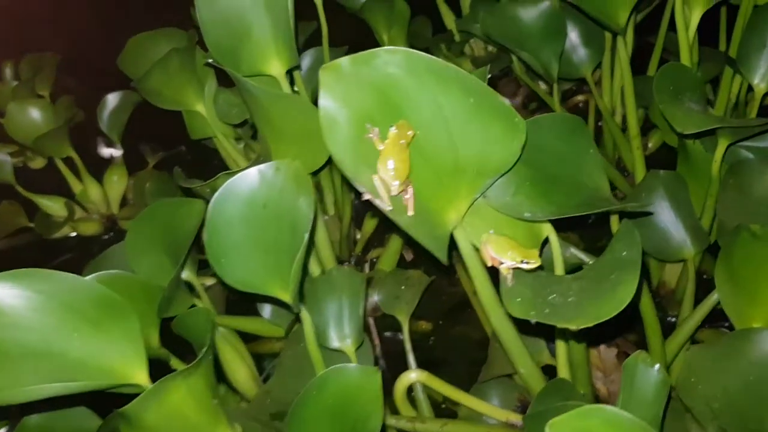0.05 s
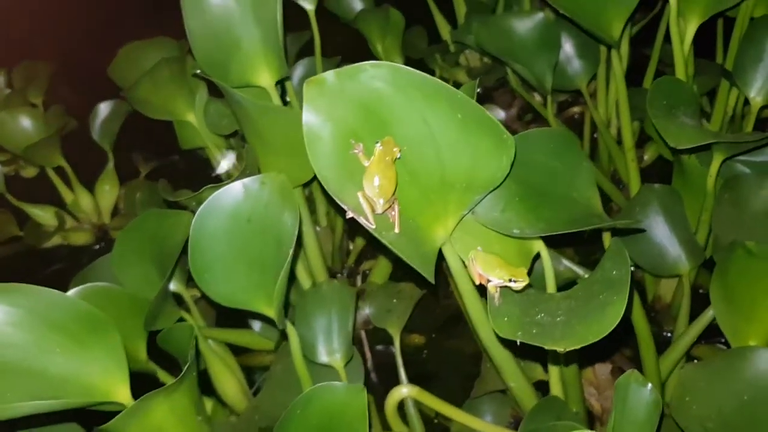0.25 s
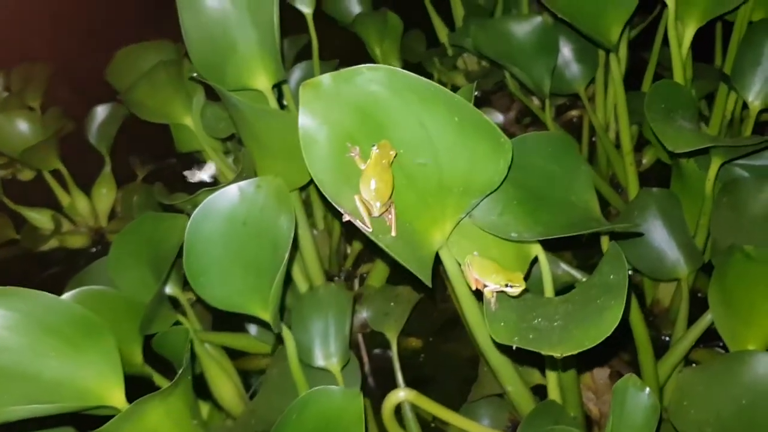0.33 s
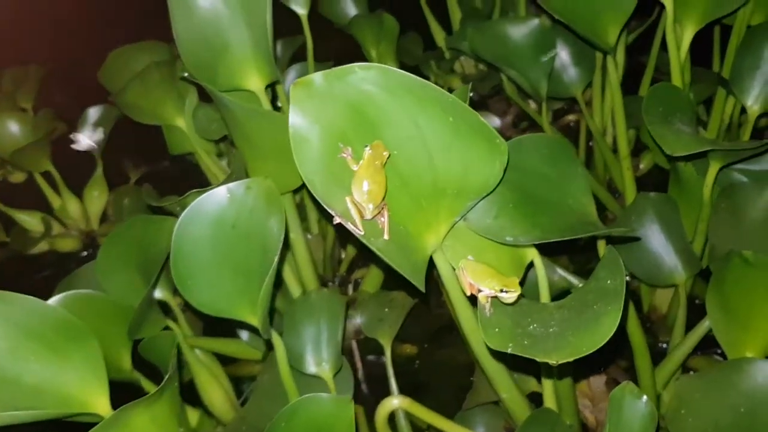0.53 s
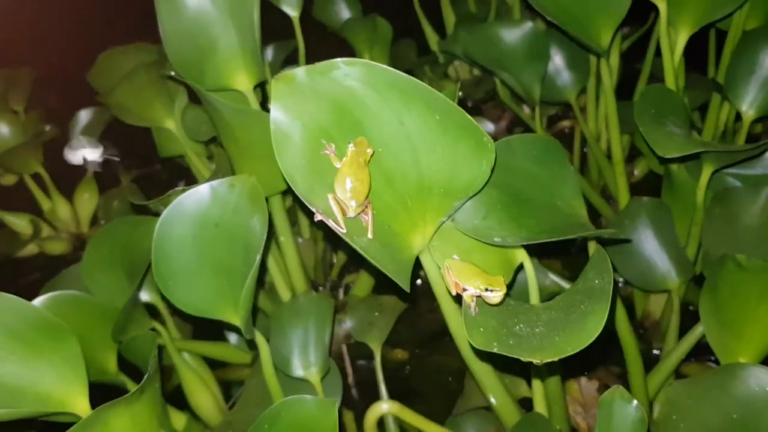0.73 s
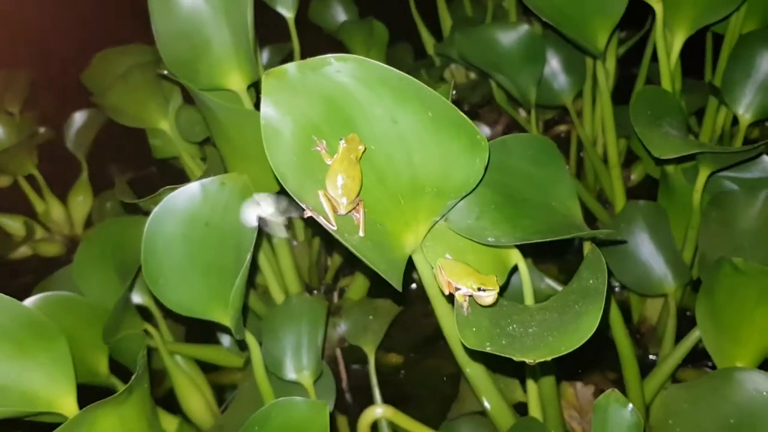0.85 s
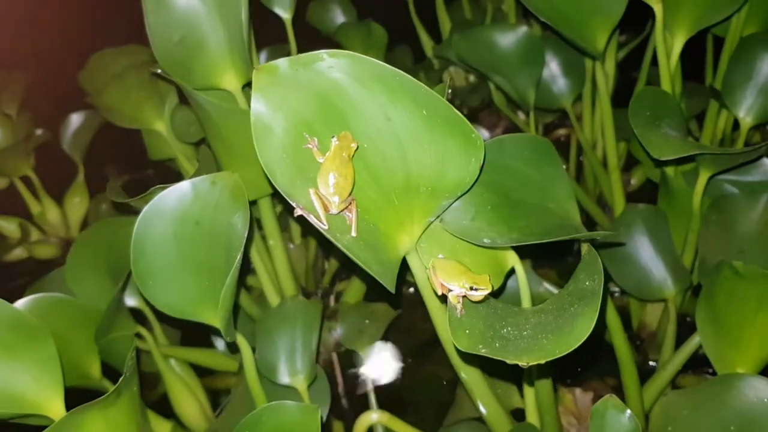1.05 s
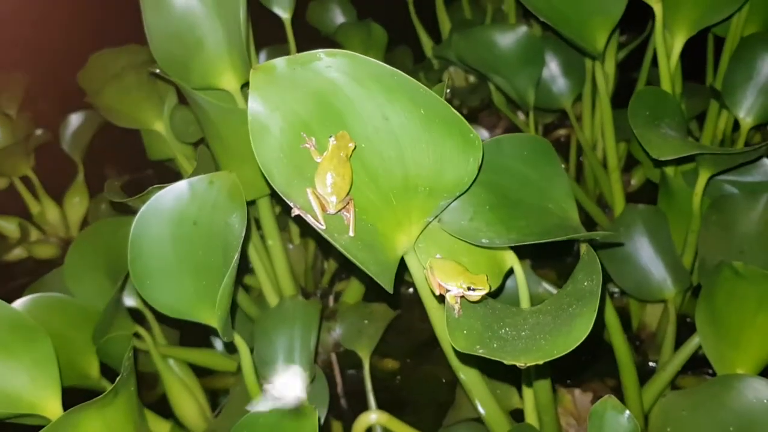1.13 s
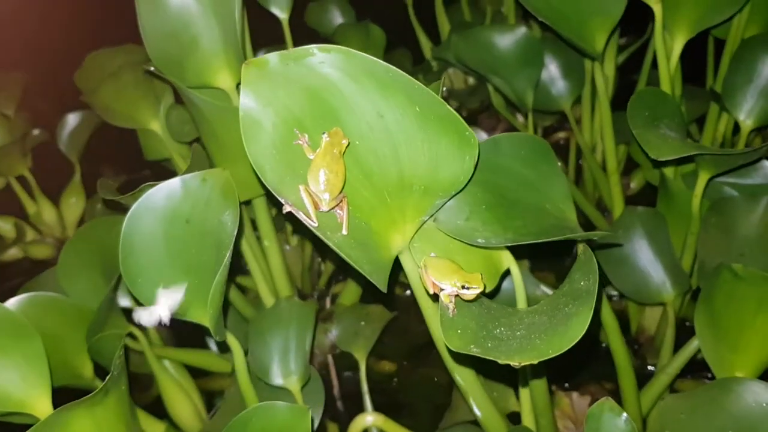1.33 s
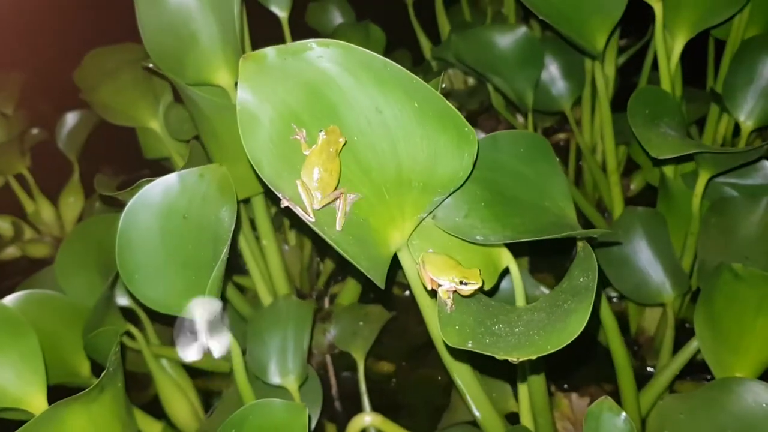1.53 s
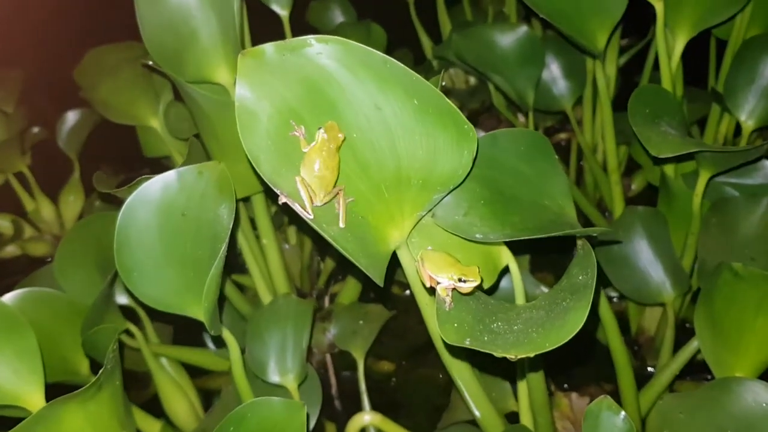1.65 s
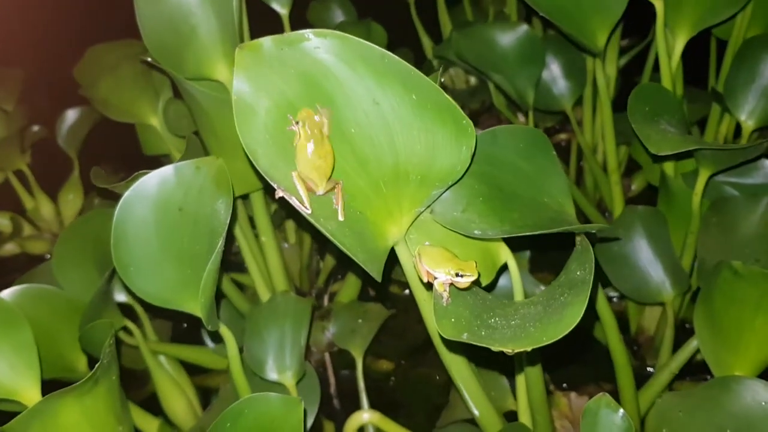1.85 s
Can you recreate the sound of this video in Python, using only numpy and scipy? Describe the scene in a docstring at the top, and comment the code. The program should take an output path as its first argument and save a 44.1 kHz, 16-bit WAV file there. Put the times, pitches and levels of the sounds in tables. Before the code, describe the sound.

A small tree frog clicks close by, slightly right, from the start. Its rattle grows louder and higher, speeds up near 0.9 seconds and stops dead at about 1 second. A farther frog answers at once with a short trill, and a much fainter one trills around 1.7 seconds. Throughout, night insects hiss softly and a distant, lower frog chorus throbs over the wetland's faint rumble.

```python
"""A small tree frog clicks close by, a little to the right, on a floating leaf. Its rattle grows louder,
higher and finally faster, then stops dead. Each click is a snap of its voice box that rings its throat
and vocal sac, the pouch under its chin. Two farther frogs answer with short trills. Behind them a distant
low frog chorus throbs, night insects hiss and the open wetland rumbles faintly."""
import sys
import numpy as np
from scipy import signal
from scipy.fft import rfft, irfft
from scipy.io import wavfile
from scipy.ndimage import uniform_filter1d, minimum_filter1d

SR = 44100
rng = np.random.default_rng(int(sys.argv[2]) if len(sys.argv) > 2 else 0)


def to_wav(s):
    """Save 16-bit WAV."""
    ch = np.atleast_2d(s).T  # columns
    pcm = np.round(np.clip(ch, -1, 1) * 32767)  # PCM
    wavfile.write(sys.argv[1], SR, pcm.astype(np.int16))


N = 83790


def undb(db):
    """Turn decibels into a number to multiply by."""
    return 10 ** (np.asarray(db) / 20)


def level(x, db):
    """Set the average (rms) level of each channel."""
    return x * undb(db) / np.sqrt(np.mean(x ** 2, axis=-1, keepdims=True))


def fade(points):
    """A volume curve through (time_s, level_db) points."""
    return undb(np.interp(np.arange(N) / SR, *np.array(points).T))


def add(out, start_s, sound):
    """Mix a short sound in at a given time."""
    i = int(np.clip(start_s * SR, 0, N))
    out[i:i + len(sound)] += sound[:N - i]


def cut(x, hz, kind, order=4):
    """Keep the "high" or the "low" side of a frequency."""
    return signal.sosfilt(signal.butter(order, hz, kind, fs=SR, output="sos"), x)


def colour(x, points):
    """Shape a sound's tone by (frequency_hz, level_db) points."""
    hz, db = np.array(points).T
    freqs = np.maximum(np.fft.rfftfreq(N, 1 / SR), 1)
    return irfft(rfft(x) * undb(np.interp(np.log(freqs), np.log(hz), db)), N)


def noise(points):
    """Two unrelated noises shaped by (frequency_hz, level_db) points."""
    return colour(rng.standard_normal((2, N)), points)


def wander(turns_per_s):
    """A smooth random wobble, mostly between -1 and 1."""
    step = int(SR / turns_per_s)
    return uniform_filter1d(np.repeat(rng.standard_normal(N // step + 1), step), step)[:N]


def ring(hz, swell_ms):
    """A tone that swells smoothly to its peak and dies away."""
    swell_s = swell_ms / 1000
    t = np.arange(int(9 * swell_s * SR)) / SR
    return (t / swell_s * np.exp(1 - t / swell_s)) ** 2 * np.sin(2 * np.pi * hz * t)


def echoes(x, db, first_s, decay_s):
    """A dense cloud of echoes, different at each ear, that falls 60 dB in decay_s."""
    t = np.arange(SR // 2) / SR
    cloud = rng.standard_normal((2, len(t))) * (t > first_s) * np.exp(-np.log(1000) * t / decay_s)
    cloud /= np.sqrt(np.sum(cloud ** 2, axis=1, keepdims=True))
    return undb(db) * signal.fftconvolve(x[None], cloud, axes=1)[:, :N]


def pulse_train(pulses_per_s, swell_ms, pitch, jitter=0.14, spread_db=3):
    """Uneven pulses, each ringing at the pitch of its moment."""
    out, start_s = np.zeros(N), 0.
    for late, loud in rng.standard_normal((N // 100, 2)):
        if start_s * SR >= N:
            break
        add(out, start_s, undb(spread_db * loud) * ring(pitch[int(start_s * SR)], swell_ms))
        start_s += np.exp(jitter * late) / pulses_per_s
    return level(out, 0)


def rumble():
    """A faint low rumble, nearly alike in both ears, with one soft bump."""
    # tone of the rumble: frequency_hz, level_db
    tone = [(20, -13), (45, -5.5), (72, -2), (100, -2), (140, -13.5), (220, -24), (500, -36)]
    middle, side = level(noise(tone), db=-66)
    add(middle, start_s=1.208, sound=undb(-53) * ring(hz=68, swell_ms=20))
    return middle + undb(-14) * np.array([side, -side])


def rush():
    """A soft low rush that grows with the rattle and ends with it."""
    # tone of the rush: frequency_hz, level_db
    tone = [(60, 0), (150, 3.5), (600, 4), (1200, -6.5)]
    # its rise and fall: time_s, level_db
    loudness = [(0, -73), (.35, -68.5), (.85, -60.5), (.97, -59), (1.01, -100)]
    return level(noise(tone), 0) * fade(loudness)


def insects():
    """Many insects merge into a flickering hiss."""
    # tone of the hiss: frequency_hz, level_db
    tone = [(4500, -36), (5600, -11.5), (6300, -3.5), (6800, -3), (7700, 3.5), (8300, -3), (9200, -18),
            (10500, -27), (15000, -49), (17000, -38.5)]
    hiss = noise(tone)
    flicker_db = 2 * np.array([wander(94), wander(70)])
    return level(hiss * undb(flicker_db), db=-51)


def chorus():
    """Low pulsed calls from far across the water overlap into a throb that swells and eases."""
    # one frog a row: pitch_hz, level_db, pulses_per_s, swell_ms
    voices = [(827.3, -47.5, 63, 5.8), (906.5, -50.5, 42, 6), (883, -49, 44, 5.4), (1105, -55.5, 39, 1.45),
              (1135, -56.5, 41, 2.25)]
    # far calls blurred into noise: frequency_hz, level_db
    blur_tone = [(200, -31), (450, -20), (680, -7), (850, 0), (1300, -0.5), (1550, -2.5), (1950, -1.5),
                 (2600, -8), (3400, -19.5), (4300, -9), (5000, -24.5), (9000, -45.5)]
    # swell of the whole chorus: time_s, boost_db
    swell = [(0, 0), (.3, 2.5), (.6, 7), (.85, 4.5), (1.1, 2), (1.9, 1)]
    calls = 0
    for hz, db, pulses_per_s, swell_ms in voices:
        pitch = hz * (1 + 0.009 * wander(20))
        voice = pulse_train(pulses_per_s, swell_ms, pitch, jitter=0.17, spread_db=2)
        early = echoes(voice, db=3, first_s=0, decay_s=0.011)
        late = echoes(voice, db=0.59, first_s=0.0052, decay_s=0.16)
        calls = calls + level(early + late, db)
    blur = level(noise(blur_tone), db=-54.5)
    return fade(swell) * (cut(calls, 810, "high", order=8) + blur)


def far_frog(curve):
    """A fast trill that swells and rises, smeared by the plants in between."""
    # faint higher tones of the trill: pitch_multiple, level_db
    overtones = [(2, -29), (3, -31.5)]
    pulses_per_s, swell_ms = 140, 1.1
    t = np.arange(N) / SR
    times, db, hz = np.array(curve).T
    pitch = np.interp(t, times, hz)
    trill = pulse_train(pulses_per_s, swell_ms, pitch)
    for multiple, overtone_db in overtones:
        trill += undb(overtone_db) * pulse_train(pulses_per_s, swell_ms / multiple, multiple * pitch)
    loudness = undb(np.interp(t, times, db)) * (t > times[0]) * (t < times[-1])
    trill = cut(trill, 3500, "high") * loudness
    early = echoes(trill, db=-1, first_s=0, decay_s=0.06)
    late = echoes(trill, db=-8.5, first_s=0.0085, decay_s=0.46)
    return level(early + late, 0) * np.std(trill)


def answering_frogs():
    """Two frogs trill in turn as the rattle ends, the second much fainter."""
    # the first frog's trill: time_s, level_db, pitch_hz
    first = [(.96, -63, 4140), (.985, -31, 3980), (1.011, -35, 4120), (1.075, -35.5, 4340),
             (1.13, -27, 4250), (1.148, -59.5, 4240), (1.16, -67, 4370)]
    # the farther frog's trill: time_s, level_db, pitch_hz
    second = [(1.6, -65, 3900), (1.68, -55.5, 4030), (1.755, -51, 4250), (1.79, -63, 4220),
              (1.82, -66, 4250)]
    return far_frog(first) + far_frog(second)


def frog_clicks():
    """Each snap of the voice box briefly rings the vocal sac, the throat and their overtones."""
    # one click a row: start_s, sac_db, sac_pitch_hz, throat_db, overtone_db
    clicks = [(0.0235, -28, 3590, -46, -48), (0.0419, -27, 3250, -51, -53), (0.1031, -25.5, 3200, -34, -39),
              (0.1209, -22, 3240, -31.5, -40.5), (0.158, -24, 3250, -34.5, -40),
              (0.1765, -22, 3240, -31.5, -37.5), (0.2088, -16.5, 3230, -32.5, -34),
              (0.2276, -18.5, 3260, -31, -35.5), (0.28, -21, 3200, -30, -35.5),
              (0.298, -19, 3420, -29.5, -33.5), (0.3176, -20.5, 3830, -31, -39),
              (0.3399, -16, 3500, -29, -33.5), (0.3583, -17.5, 3280, -31, -33.5),
              (0.395, -15, 3290, -28, -31), (0.412, -7.5, 3440, -30, -28.5),
              (0.4535, -17, 3750, -31.5, -31), (0.4714, -17.5, 3420, -29, -29),
              (0.4917, -15.5, 3400, -29, -27.5), (0.5123, -15.5, 3820, -33.5, -35),
              (0.5314, -14, 3840, -31, -30), (0.5507, -11, 3620, -36, -30), (0.5706, -10, 3890, -30, -27.5),
              (0.5903, -13.5, 3860, -34, -30.5), (0.6096, -14.5, 3840, -28.5, -27.5),
              (0.6286, -15.5, 3540, -28.5, -25.5), (0.6475, -12.5, 3740, -25.5, -22.5),
              (0.6673, -12, 3880, -36, -31), (0.6885, -13, 3920, -28.5, -29.5),
              (0.7079, -11, 3890, -26.5, -27.5), (0.7274, -7, 3900, -27.5, -22),
              (0.7457, -11.5, 3870, -30, -25.5), (0.7844, -9, 3790, -28, -21.5),
              (0.8035, -5.5, 3690, -27.5, -18.5), (0.823, -7.5, 3820, -26.5, -20),
              (0.843, -8, 3820, -26, -20), (0.8641, -4.5, 4000, -23.5, -19),
              (0.8798, -4, 4040, -23.5, -17.5), (0.8909, -13, 3890, -30, -23),
              (0.9113, -9, 4060, -31.5, -22.5), (0.9299, -6, 3790, -33.5, -19),
              (0.9428, -7, 3850, -28.5, -19.5), (0.9523, -4.5, 3840, -36.5, -18),
              (0.962, -4.5, 3860, -31, -24), (0.9716, -7, 3840, -36.5, -20.5)]
    # throat tones below the sac's pitch: pitch_hz, level_db, swell_ms
    throat = [(2462, -0.5, 0.82), (2820, -2.5, 1)]
    # tones above the sac's pitch: pitch_hz, level_db, swell_ms
    overtones = [(5466, -1, 0.41), (6080, -5, 0.89), (7860, -11.5, 0.23)]
    # the highest tones, whose strength varies most between clicks: pitch_hz, level_db, swell_ms
    snap = [(9630, -20.5, 0.43), (12000, -26.5, 0.19), (15600, -23, 0.2)]
    voice = np.zeros(N)
    for start_s, sac_db, sac_hz, throat_db, overtone_db in clicks:
        sac_swell_ms = 0.52 + 0.14 * start_s  # the sac rings longer as it fills
        ring_s = start_s + .0003
        add(voice, ring_s, undb(sac_db + 3) * ring(sac_hz, sac_swell_ms))
        groups = (throat, throat_db, 1.5), (overtones, overtone_db, 1.5), (snap, overtone_db, 4.5)
        for tones, group_db, spread_db in groups:
            for hz, db, swell_ms in tones:
                detune, loud = rng.standard_normal(2)
                gain = undb(group_db + 10 + db + spread_db * loud)
                late_s = .0001 * rng.random()
                add(voice, ring_s + late_s, gain * ring(hz * (1 + .012 * detune), swell_ms))
    return voice


def near_frog():
    """The rattle arrives from a little to the right and echoes off nearby leaves and the wider marsh."""
    # tone of the call as it leaves a body too small to give bass: frequency_hz, level_db
    body_tone = [(700, -20.5), (1500, -10), (2100, -2.5), (4500, -2), (4900, 3), (5300, -2.5), (15000, -4),
                 (16000, 0.5)]
    voice = colour(frog_clicks(), body_tone)
    left_delay_s = .00001
    freqs = np.fft.rfftfreq(N, 1 / SR)
    left = irfft(rfft(voice) * np.exp(-2j * np.pi * freqs * left_delay_s), N)
    direct = np.array([undb(-4.8) * left, undb(2.6) * voice])
    leaves = echoes(voice, db=-13, first_s=.002, decay_s=.017)
    marsh = echoes(cut(voice, 6000, "low", order=2), db=-17, first_s=.005, decay_s=0.12)
    return direct + leaves + marsh


def scene():
    """The near frog, its neighbours and the wetland."""
    return near_frog() + answering_frogs() + chorus() + insects() + rumble() + rush()


def record(dry):
    """A fast limiter turns down any peak above the ceiling; the highest treble is cut."""
    ceiling, smooth_s, top_hz = .98, .004, 16000
    size = int(smooth_s * SR)
    allowed_gain = ceiling / np.maximum(np.abs(dry).max(axis=0), ceiling)
    gain = uniform_filter1d(minimum_filter1d(allowed_gain, 2 * size), size)
    return signal.sosfilt(signal.ellip(8, .2, 70, top_hz, fs=SR, output="sos"), gain * dry)


dry = scene()
out = record(dry)
to_wav(out)
```